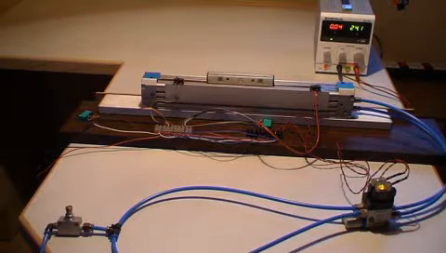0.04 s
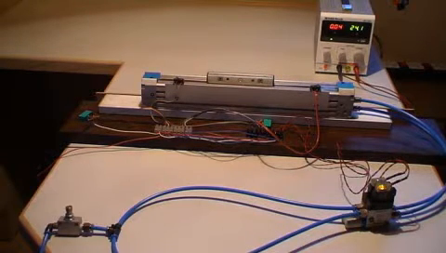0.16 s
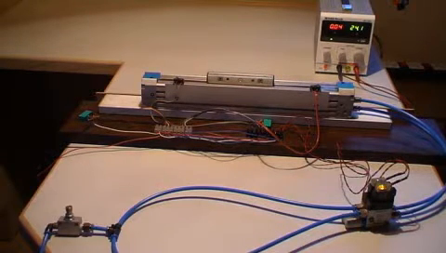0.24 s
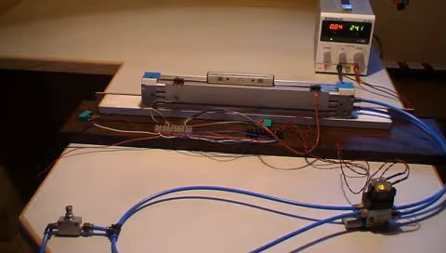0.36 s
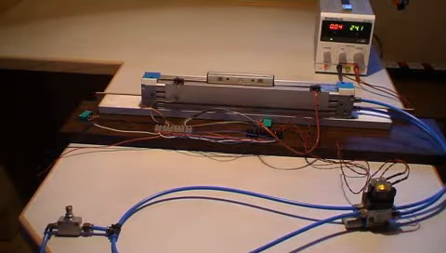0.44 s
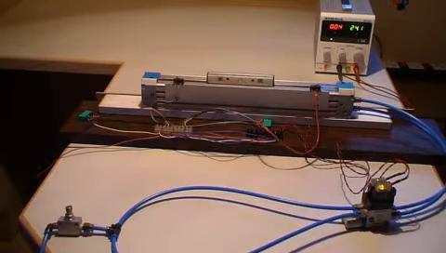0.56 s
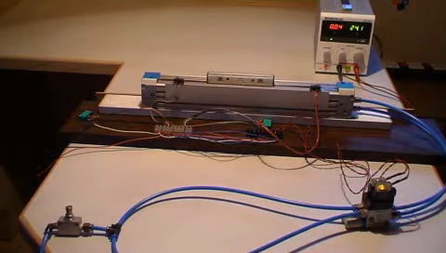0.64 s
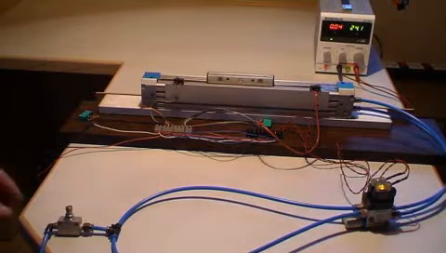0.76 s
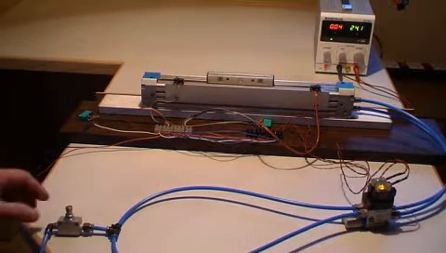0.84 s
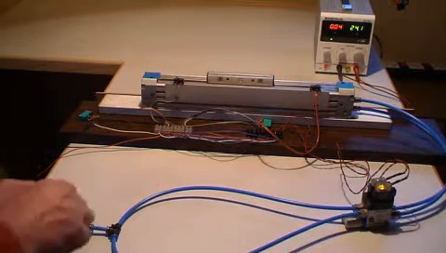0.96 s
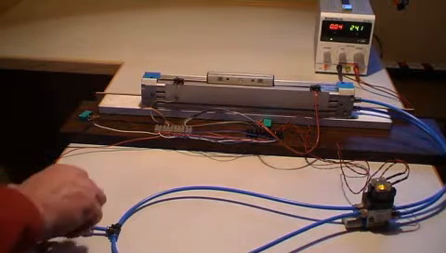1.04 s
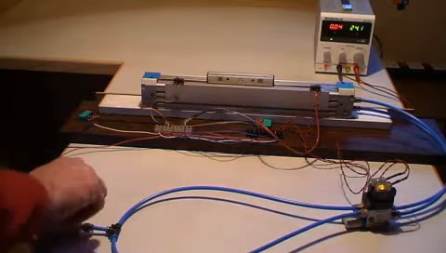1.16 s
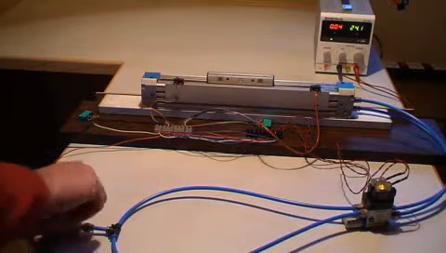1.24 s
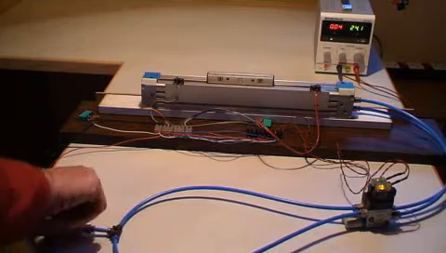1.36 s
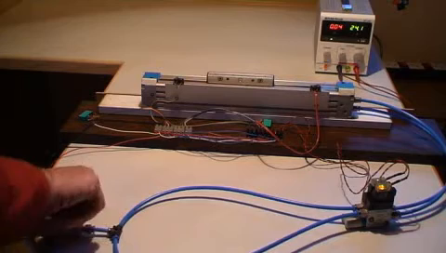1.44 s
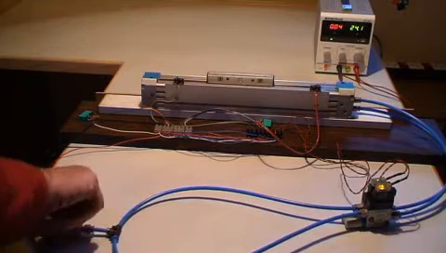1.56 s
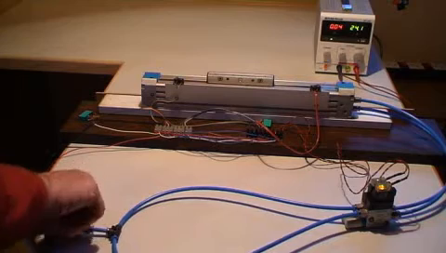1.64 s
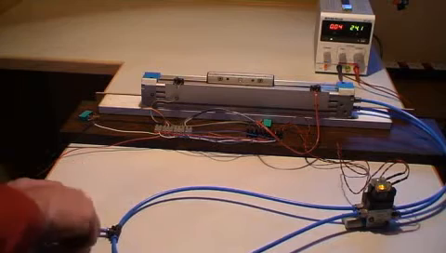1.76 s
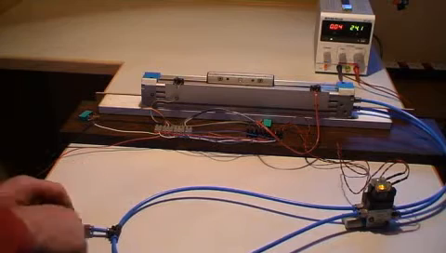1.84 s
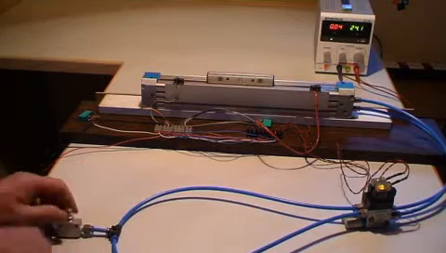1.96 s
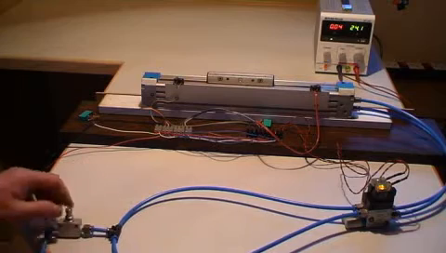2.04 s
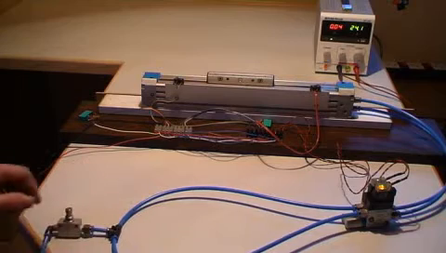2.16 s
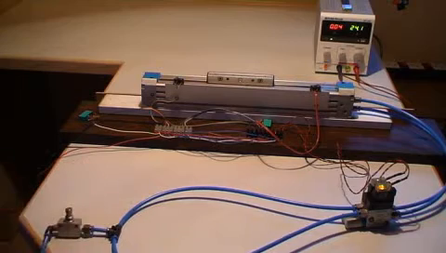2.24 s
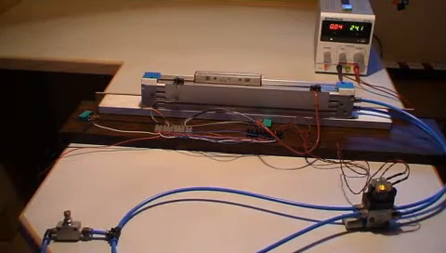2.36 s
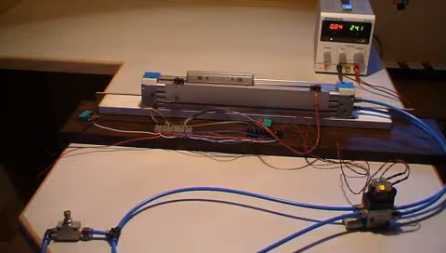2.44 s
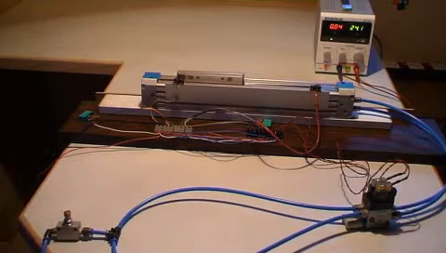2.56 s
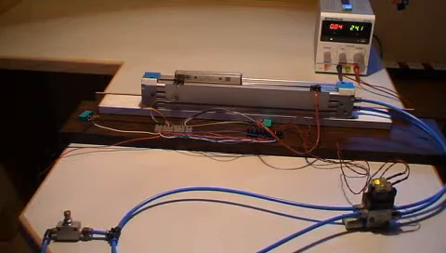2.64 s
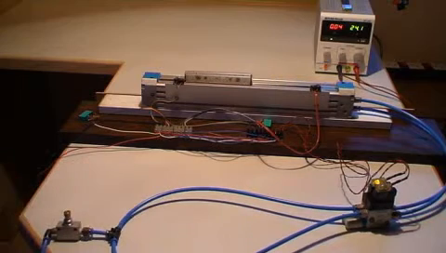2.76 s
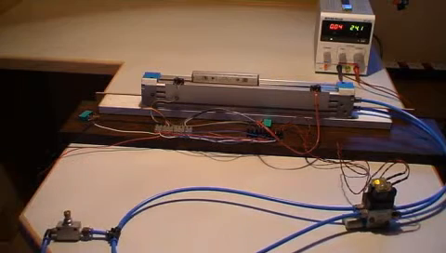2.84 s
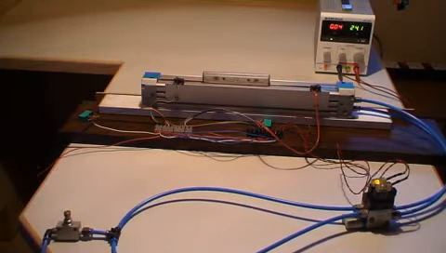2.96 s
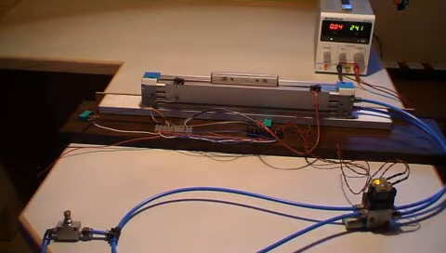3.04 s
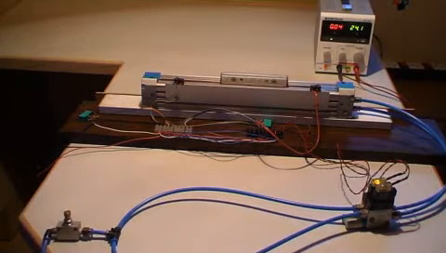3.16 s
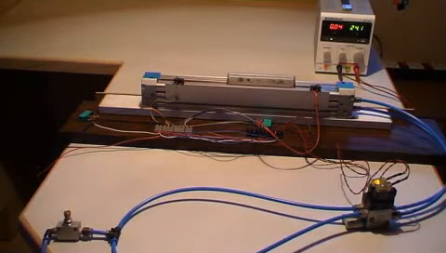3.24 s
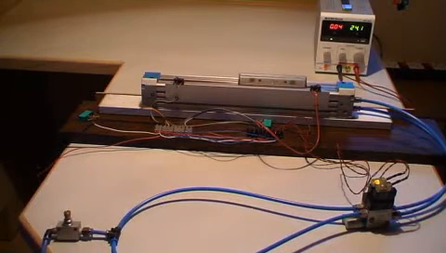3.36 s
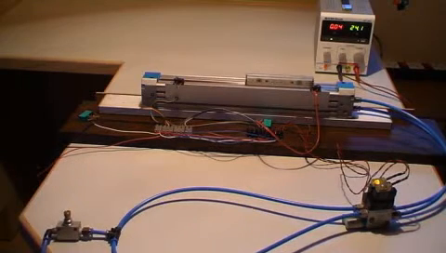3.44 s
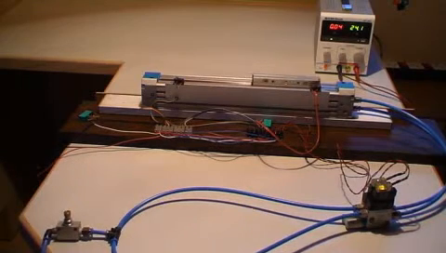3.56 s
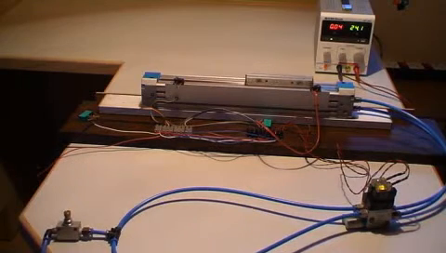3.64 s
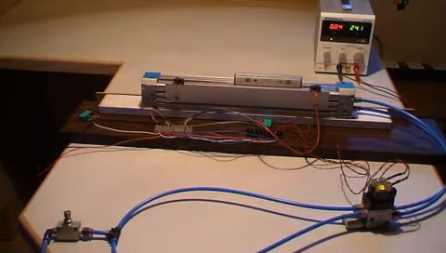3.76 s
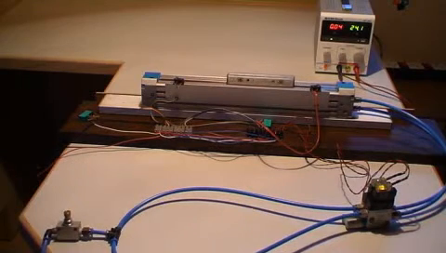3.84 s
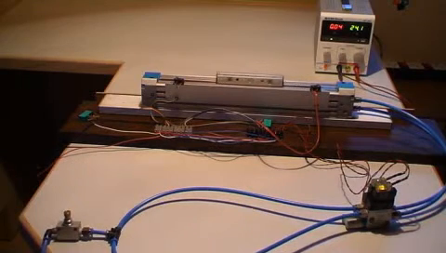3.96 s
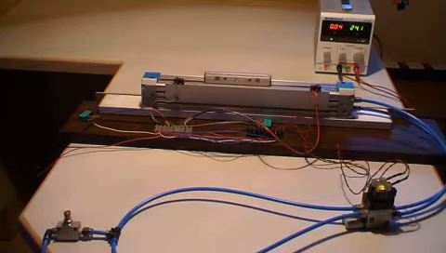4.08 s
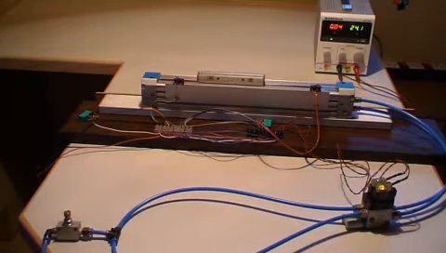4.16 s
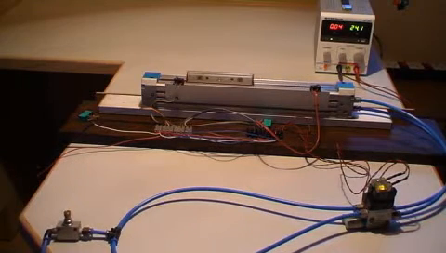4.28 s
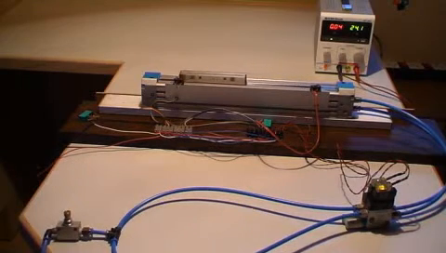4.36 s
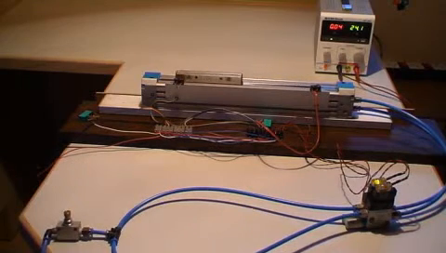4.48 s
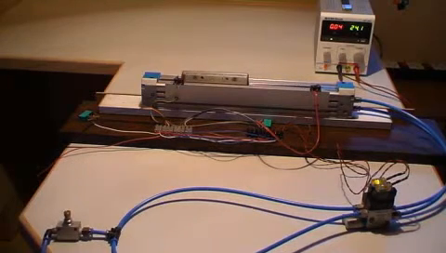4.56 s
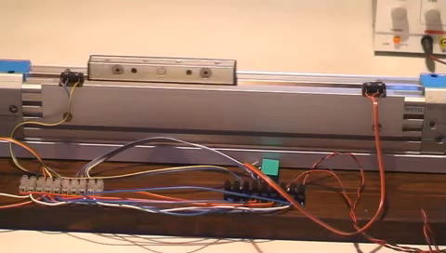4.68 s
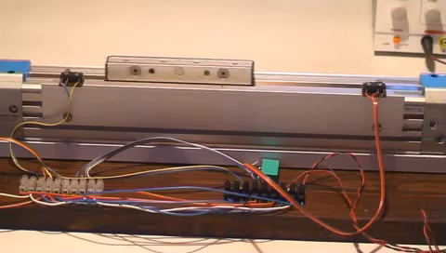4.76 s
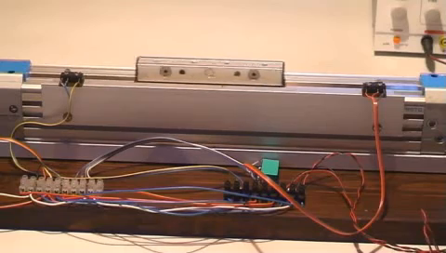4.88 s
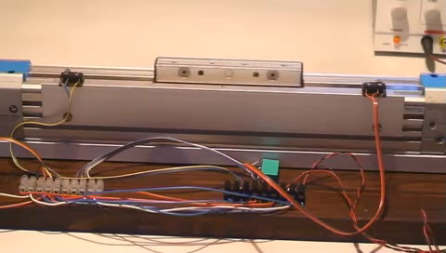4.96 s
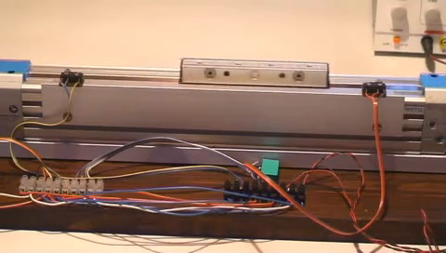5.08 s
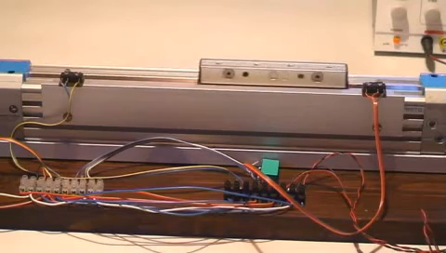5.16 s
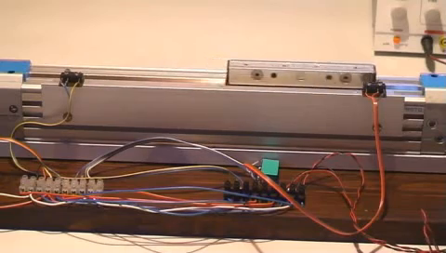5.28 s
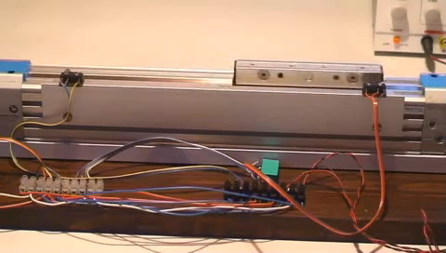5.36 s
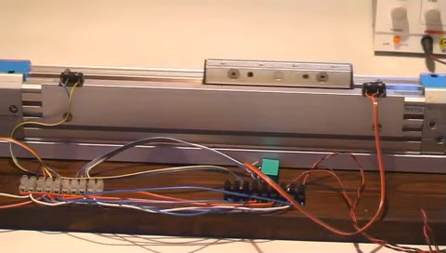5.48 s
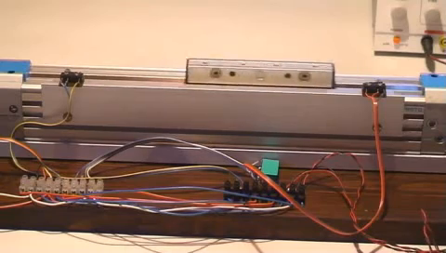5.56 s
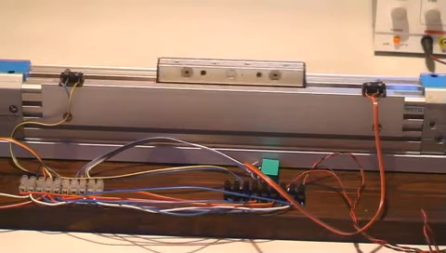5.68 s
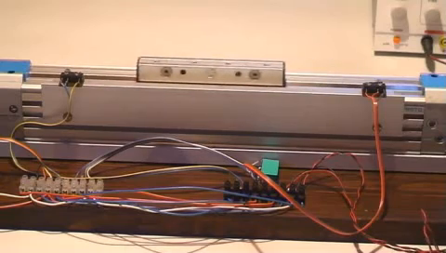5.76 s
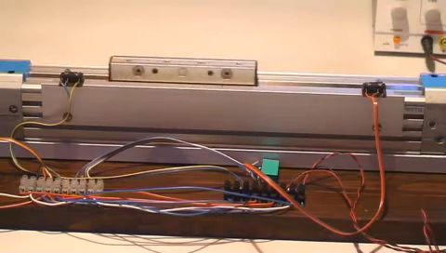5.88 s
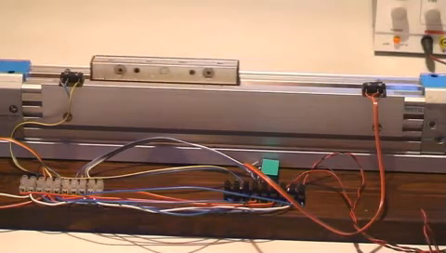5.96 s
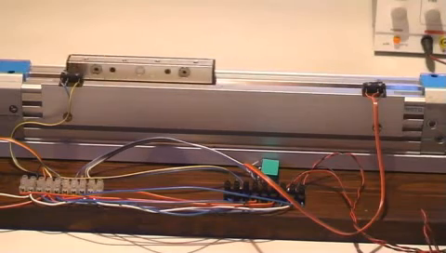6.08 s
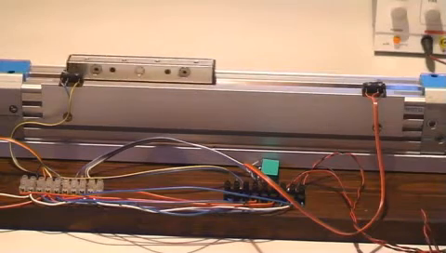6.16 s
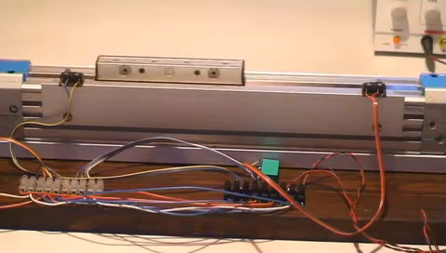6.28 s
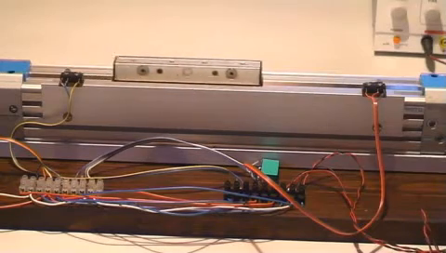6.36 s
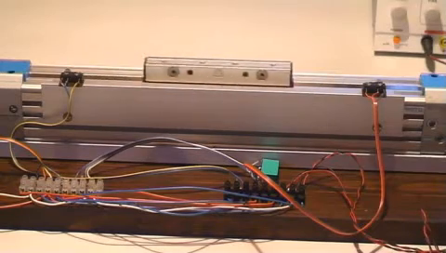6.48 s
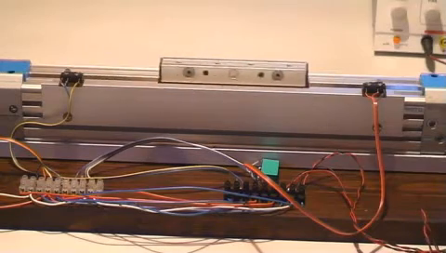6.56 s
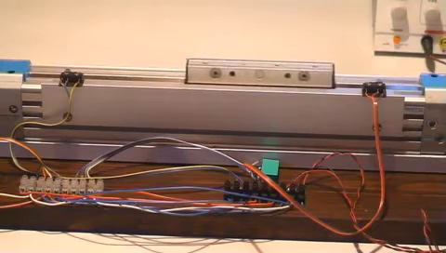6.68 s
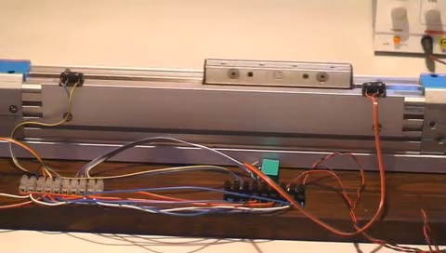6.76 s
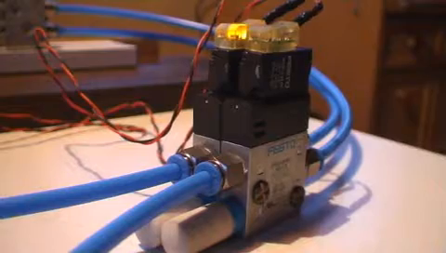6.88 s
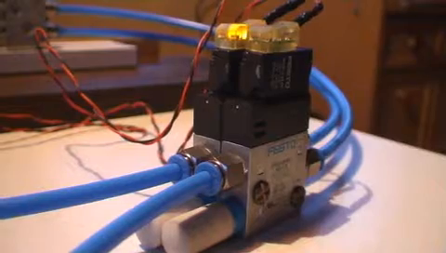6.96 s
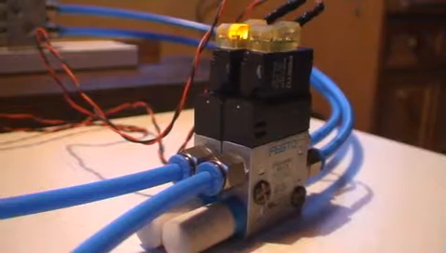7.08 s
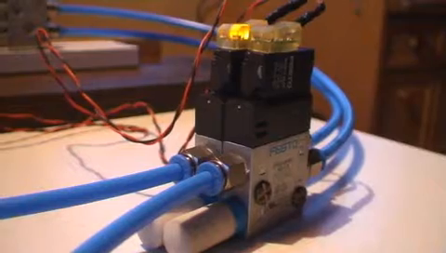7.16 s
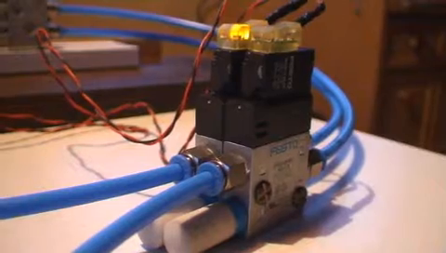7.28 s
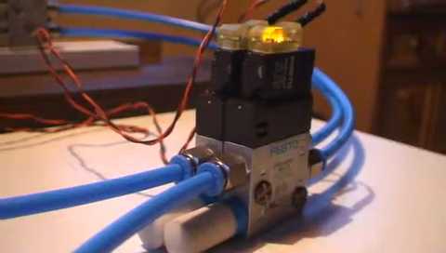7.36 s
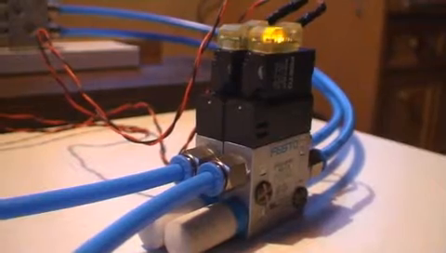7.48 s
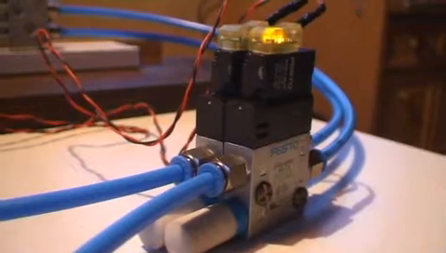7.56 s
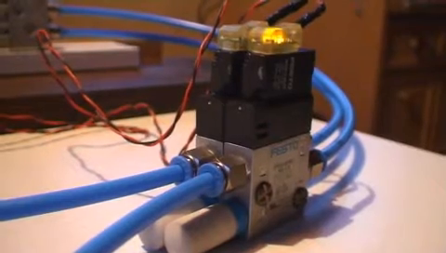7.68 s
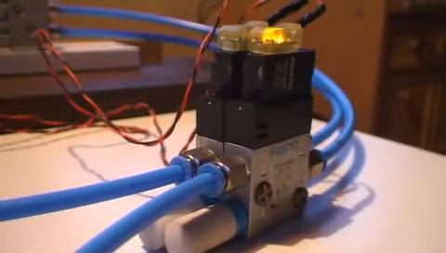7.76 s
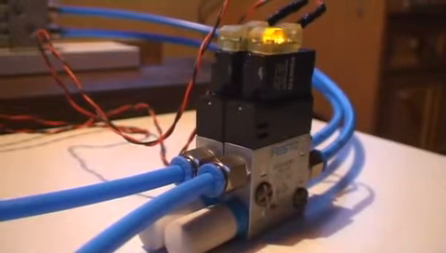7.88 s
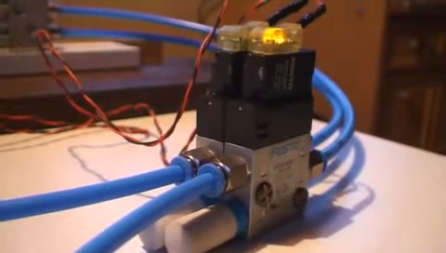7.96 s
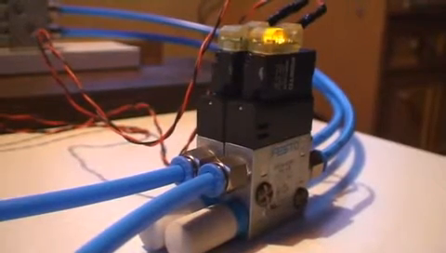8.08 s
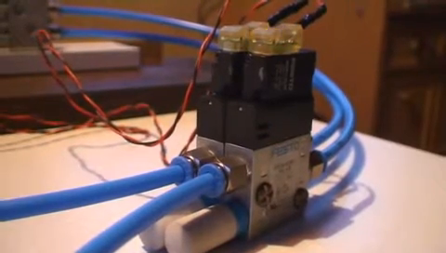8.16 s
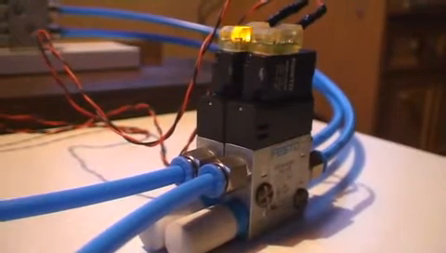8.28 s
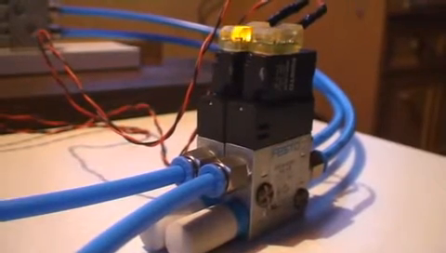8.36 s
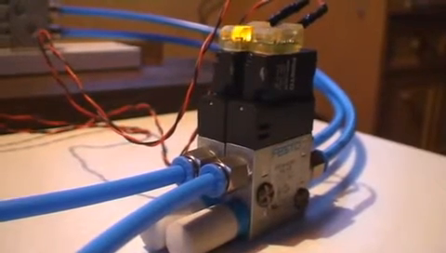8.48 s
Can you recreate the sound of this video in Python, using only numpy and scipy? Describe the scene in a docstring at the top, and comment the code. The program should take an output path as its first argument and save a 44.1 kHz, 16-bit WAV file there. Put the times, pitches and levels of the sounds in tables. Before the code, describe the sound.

Close, hissy stereo microphone on a workbench. First, quiet handling knocks, thin clicks and one rough scrape of a hand. Then the hiss rises and a sliding cylinder runs: seven evenly spaced reversals, each a tight burst of metallic clicks, a short sputtering air puff, a hollow woody-metal thump with knocks, and a brief room tail. Left and right ends differ slightly; two small clicks answer afterwards.

```python
"""In a small room a hand sets the throttle of a bench rig: dry ticks, swishes, a scuff, rustling cloth.
Wide microphone hiss then steps up, thin whistles join it, and a rodless pneumatic cylinder starts to shuttle.
At each end the carriage meets a lever, a limit switch clicks, the solenoid valve snaps over, the vented chamber
puffs through its silencer and the reversal thumps the bench; the carriage knocks in its guide and fittings rattle.
Switch and solenoid then drop back. Clicks and thumps are ringing modes; puff, scuff and hiss are shaped noise."""
import sys
import numpy as np
from scipy import signal
from scipy.fft import rfft, irfft, next_fast_len
from scipy.io import wavfile

SR = 44100
rng = np.random.default_rng(int(sys.argv[2]) if len(sys.argv) > 2 else 0)


def master(y):
    """Save y as 16-bit WAV."""
    cut = np.clip(np.atleast_2d(y).T, -1, 1)
    pcm = np.round(cut * 32767)  # scale
    wavfile.write(sys.argv[1], SR, pcm.astype(np.int16))


N = 376173   # length in samples
AGE = np.arange(32768) / SR   # time since the start of a short sound, in seconds
HISS_STEP_S, HISS_BEFORE_DB = 2.358, -9   # when the hiss steps up; its mean level until then, against after
LOW_CUT_HZ, CUTOFF_HZ = 40, 15400   # corners of the microphone and of the steep top cut

# Colours are curves over frequency: only their shape counts, each sound sets its own loudness.
# Levels inside an event are relative to that event.

# Carriage trips a limit switch: trip_s, end, spool_delay_s, thump_db, exhaust_db
REVERSALS = [(2.5895, "left", 0.051, -37, -31.5), (3.531, "right", 0.044, -35, -34),
             (4.4324, "left", 0.0405, -33.5, -32.5), (5.3839, "right", 0.0438, -33.5, -34.5),
             (6.3093, "left", .0412, -33, -32.5), (7.2851, "right", 0.045, -33.5, -34),
             (8.234, "left", 0.041, -33.5, -32)]
# Modes of rail, board and bench: mode_hz, t60_s, left_end_db, right_end_db
BENCH_MODES = [(161.8, 0.57, -11.5, -9.5), (181, 0.16, -5.5, -3), (236.5, 0.13, -2.5, -14),
               (281, 0.2, -4, -6), (316.8, 0.41, -3, -2.5), (373, 0.46, -7, -3.5), (437, 0.55, -11.5, -11),
               (475, 0.36, -10.5, -7), (491, 0.51, -6.5, -3.5), (539, 0.53, -10.5, -21), (627, 0.21, 0, -7),
               (680, 0.22, 1.5, -15), (698, 0.23, 2.5, -19), (715, 0.34, -7.5, -30), (723, 0.34, -4, -9),
               (788, 0.43, -7.5, -8), (832, 0.42, -3, -2), (878, 0.17, -5.5, 0), (899, 0.66, -10, -13.5),
               (982, 0.92, -17, -15), (1059, 0.87, -20, -23), (1204, 0.32, -24, -3.5), (1220, 0.11, 5, 9.5),
               (1245, 0.12, 9, -1), (1350, 0.15, -1, -9), (1967, 0.08, 9.5, 7), (2055, 0.093, 10, 6),
               (2360, 0.11, -3, 0), (2770, 0.08, 5, -16), (3870, 0.22, -4.5, -25), (4130, 0.5, -19, -26)]
# Carriage jolts the bench and rocks back, by end: delay_s, level_db
JOLTS = {"left": [(-.001, -4), (.023, 0.5), (.038, -1.5), (.07, 0), (.105, -6.5)], "right": [(-.001, 0.5),
         (.019, -2.5), (.04, 0), (.057, -2.5), (.09, -7), (.122, -6)]}
# Colour of dense small bench resonances: freq_hz, density_db
THUD = [(15, -50), (35, -31), (70, -21), (125, -18), (170, -2), (235, -10), (320, 4), (500, 2.5), (800, -2),
        (1000, -3), (1300, -0.5), (1800, -21), (4000, -13.5), (12000, -62)]
# Play in the guide lets the carriage knock on the rail, by end: delay_s, level_db
RAIL_KNOCKS = {"left": [(.02, 2.5), (.065, 5), (.093, -3)], "right": [(.016, 3), (.048, 4.5), (.082, 1.5),
               (.108, -12)]}
# What that knock rings with, by end: mode_hz, level_db, t60_s
RAIL_RING = {"left": [(494, -1, 0.043), (627, -5, .03), (720, 0.5, 0.042), (823, -4, 0.038),
             (1000, -6, 0.033)], "right": [(620, -9, .03), (784, -4.5, .03), (903, 1, .035),
             (1218, 0.5, .03)]}

# Colour of air through each silencer, by end: freq_hz, density_db
EXHAUST_COLOUR = {"left": [(500, -20), (1100, -24), (1500, -6), (2000, -4.5), (2700, -3.5), (3450, -1.5),
                  (4500, -1.5), (6200, -14), (7200, -4), (10500, -12.5), (15500, -44)],
                  "right": [(500, -27), (1100, 8), (1500, 0), (2000, 2), (2800, -2), (3700, -0.5),
                  (5200, 1), (6200, -13), (8000, 0), (10500, -17), (15500, -36)]}
# How long each band of the puff lasts: freq_hz, t60_s
EXHAUST_T60 = [(1200, 0.084), (2500, 0.12), (5000, 0.073), (10000, 0.058)]
# Speed of the puff's sputter: rate_hz, density_db
SPUTTER = [(100, -6.0), (700, 26), (2500, -39)]
# Spool hits its stop and rebounds, by end: delay_after_opening_s, peak_db (against the exhaust level)
SPOOL_KNOCKS = {"left": [(.0052, -4), (.0083, 13.5), (.0115, 5), (.021, 8)], "right": [(.0076, 14.5),
                (.0088, 8), (.015, -6)]}
# Colour of the spool's dull kick through the valve body: freq_hz, density_db
KICK = [(15, -47), (45, -19), (100, -5.5), (300, 3.5), (900, -9), (1600, -8.5), (3000, -15.5), (9000, -54)]
# Colour of the spool meeting its stop: freq_hz, density_db
CLACK = [(400, -16), (1200, 4), (2300, 8), (4000, -1.5), (5600, 5.5), (8500, -7), (11000, -16),
         (15500, -29)]

# Chain of contacts started by each trip, by end: delay_s, level_db, part
PULL_IN = {"left": [(0, -33, "left switch"), (.003, -41, "left switch"), (.0133, -37.5, "coil"),
           (.015, -23.5, "left armature"), (.0232, -27, "left armature"), (.027, -23, "seat")],
           "right": [(.001, -43, "right switch"), (.0055, -42, "right switch"), (.0134, -36, "coil"),
           (.0158, -29.5, "seat"), (.0233, -22, "right armature"), (.027, -25, "seat")]}
# Carriage leaves and the switch springs back: start_s, end, level_db
RELEASES = [(2.7024, "left", -24), (3.6162, "right", -26.5), (4.531, "left", -28.5),
            (5.4732, "right", -25.5), (6.4095, "left", -30), (7.3777, "right", -26.5),
            (8.3361, "left", -29.5)]
# Solenoid drops back: start_s, end, level_db
RETURNS = [(2.741, "left", -26), (3.6525, "right", -31), (4.5696, "left", -27), (5.5068, "right", -31.5),
           (6.4494, "left", -26.5), (7.4094, "right", -31), (8.3768, "left", -25)]
# Solenoid bounces on its stop, by end: delay_s, level_db
RETURN_BOUNCES = {"left": [(0, 1), (.008, -19)], "right": [(-.0009, -2.5), (.0005, -0.5)]}
# What each part rings with, by part: mode_hz, level_db, t60_s
PART_RING = {"left switch": [(1470, -16, 0.045), (1770, -7.5, 0.016), (2320, -12, .025), (3650, -16, 0.014),
             (10760, -18, .025)], "right switch": [(3420, -7, 0.035), (3800, -9, .03), (9950, -15, .03)],
             "coil": [(703, -6, 0.21), (878, -7, 0.052), (1250, -4.5, 0.031), (5340, -6, 0.027),
             (6170, -6, 0.03), (10570, -8, 0.033)], "left armature": [(5930, -16, 0.025),
             (9700, -13, 0.014), (10400, -7.5, 0.0097), (12300, -10.5, .012)],
             "right armature": [(7870, -14.5, 0.018), (10400, -8, 0.011), (10950, -13, 0.0071),
             (11500, -4, 0.011), (12600, -10, 0.0098)], "seat": [(5360, -2, 0.0072), (6400, -9, 0.01),
             (7400, -5, 0.0071)], "left release": [(3570, -5, 0.0058), (5200, -7, 0.0092),
             (7200, -6, 0.0051), (9300, -5, 0.0055)], "right release": [(2190, -15, .008),
             (5600, -3, 0.0046), (7640, 2.5, 0.0045), (13800, 6, 0.0023)],
             "left return": [(6680, -4, 0.0073), (7100, -3.5, 0.0083), (10930, -7.5, 0.01)],
             "right return": [(3510, 0.5, 0.012), (4180, -20.5, 0.34), (5550, -6, 0.0088),
             (7700, -4, 0.0062), (10550, -2, 0.0083)]}
# First touch of a contact, by part: peak_db (against the contact level)
SNAP_DB = {"left switch": -14, "right switch": -4, "coil": -1, "left armature": -7, "right armature": -3,
           "seat": -4, "left release": -7, "right release": -3, "left return": -10, "right return": -8}
# Colour of metal on metal: freq_hz, density_db
CRACK = [(200, 3), (900, 4), (3000, -8.5), (5500, -0.5), (9000, 2), (12500, -0.5), (15500, -13.5)]
# Colour of the housing's faint buzz: freq_hz, density_db
HOUSING_BUZZ = [(300, 2.0), (900, 1.5), (2500, 3.5), (4000, 2.0), (6000, 2.5), (10000, -3.0), (15000, -26)]
# Speed of the housing's rattle: rate_hz, density_db
HOUSING_RATTLE = [(40, 22.0), (300, -12), (1000, -39)]

# Carriage meets the switch lever before the trip, by end: lead_s
LEVER_LEAD_S = {"left": .045, "right": .026}
# How it touches the lever, by end: tap_db, bump_db, slide_db
LEVER_TOUCH = {"left": (-57, -50, -80), "right": (-43, -52, -55)}
# Colour of the tap on the lever: freq_hz, density_db
LEVER_TAP = [(300, -15), (900, 0), (1250, 8), (1700, -18), (6000, -23), (7200, -12), (8500, -38)]
# Colour of the scrape along the lever: freq_hz, density_db
LEVER_SLIDE = [(400, -20), (1200, 5), (2500, -7), (5500, 1), (6300, 6), (7200, -10), (13000, -18)]
# Colour of loose fittings and wires: freq_hz, density_db
LOOSE_FITTINGS = [(150, -32), (400, -0.5), (900, -1), (1400, -5.0), (3000, -11.5), (7000, -19), (14000, -37)]

# Dull handling knocks before the run: start_s, level_db
TICKS = [(0.1432, -47.5), (.186, -51), (0.226, -58), (0.2259, -44.5), (0.2291, -50), (.704, -58),
         (0.737, -53)]
# Colour of a handling knock: freq_hz, density_db
TICK = [(15, -34), (60, -10), (200, 5), (650, 0), (1500, -11), (3000, -17), (7000, -37)]
# Thin, dry clicks among them: start_s, peak_db
THIN_CLICKS = [(.2225, -53), (.2558, -43), (.3205, -51), (.509, -50), (.704, -51), (1.348, -51),
               (1.882, -51)]
# Colour of a thin click, also of the grain in the cloth: freq_hz, density_db
THIN_CLICK = [(200, -15), (800, 4.5), (3000, -4), (5800, -9.5), (7000, -11), (14000, -30)]
# Fingers and sleeve brush past: start_s, level_db, t60_s
SWISHES = [(.317, -59, 0.081), (.354, -56.5, 0.39), (.385, -65, .5), (1.72, -69, 0.3), (1.878, -63, 0.11)]
# Colour of a swish: freq_hz, density_db
SWISH = [(300, -6), (1000, 9.5), (2500, -8), (6000, -9), (7600, -2), (8600, -14), (9100, -8), (9600, -13),
         (12000, -25)]
# Colour of a hand on the bench: freq_hz, density_db
SCUFF = [(150, -34), (400, -2), (800, 3), (1300, 2), (1800, -6), (2300, -14), (4000, -23), (9000, -45)]
# Colour of the scuff's duller tail: freq_hz, density_db
DULL_SCUFF = [(150, -36), (380, 11), (850, 6), (1300, -5), (2500, -41)]
# Speed of the scuff's roughness: rate_hz, density_db
SCUFF_ROUGHNESS = [(30, -8), (150, 3), (600, -30)]
# Soft rustles of sleeve and hand: middle_s, length_s, level_db
SLEEVE_MOVES = [(0.108, 0.24, -68), (0.426, 0.33, -70.5), (.7, 0.13, -70), (.96, .12, -71.5),
                (1.12, 0.4, -72.5), (1.79, 0.63, -71.5), (2.194, 0.12, -69), (5.948, 0.27, -63)]
# Colour of the cloth common to both sides: freq_hz, density_db
SLEEVE_MID = [(100, 1), (500, 6.5), (1200, 2), (2500, -3.5), (5000, -18), (12000, -29)]
# Colour of the cloth opposed between the sides: freq_hz, density_db
SLEEVE_SIDE = [(40, -27), (130, -2), (400, 3), (1200, 3), (3000, -8), (10000, -30), (14000, -55)]
# Speed of the cloth's unevenness: rate_hz, density_db
CLOTH_CATCHING = [(3, -8), (14, 0), (40, -7), (200, -70)]

# Air singing in the tubes: centre_hz, width_hz, level_db
WHISTLES = [(814, 12, -70.5), (1487, 36, -74.5), (4120, 160, -74.5), (9170, 350, -82)]
# Colour of the hiss common to both sides: freq_hz, density_db
HISS_MID = [(15, -46), (25, -14), (236, -0.5), (560, -1.5), (754, -3.5), (818, -4), (936, -5), (1440, -6),
            (2990, -11), (4140, -14), (4740, -14), (9320, -20), (12900, -24), (14400, -17), (16000, -56)]
# Colour of the hiss opposed between the sides: freq_hz, density_db
HISS_SIDE = [(15, -57), (25, -23), (102, -12), (206, -4), (335, -2.5), (405, -2), (503, -2.5), (818, -4),
             (1560, -9.5), (4140, -22), (9840, -36.5), (11000, -39), (12500, -41), (14400, -69),
             (16000, -72)]
# Slow and fast wavering of the opposed hiss: rate_hz, density_db
HISS_SWAY = [(1, -7), (4, -4), (12, -28), (100, -90)]
HISS_FLUTTER = [(2, -22), (30, 3), (200, -34), (1000, -80)]
# Colour of the room's reflections: freq_hz, density_db
ROOM_COLOUR = [(60, -5), (250, 3.5), (1000, 3.5), (4000, -1.5), (8000, -1.5), (15000, 2)]
# How long each band of the room's tail lasts: freq_hz, t60_s
ROOM_T60 = [(100, 0.66), (1000, 0.65), (4000, 0.46), (12000, 0.29)]
# The capsules differ in balance over frequency: freq_hz, left_minus_right_db
CAPSULE_BALANCE = [(150, 0.8), (1500, 0.3), (4000, 0), (7000, -0.5), (11500, 1)]


def from_db(db):
    """Decibels to gain."""
    return 10 ** (np.asarray(db) / 20)


def rms_one(x):
    """Scale to an rms of one."""
    return x / np.sqrt(np.mean(x ** 2) + 1e-20)


def at_hz(points, hz):
    """Read a table on a log-frequency axis."""
    known_hz, values = np.transpose(points)
    return np.interp(np.log(np.maximum(hz, 1)), np.log(known_hz), values)


def add(track, s, sound):
    """Mix a sound into a stereo track from time s."""
    start = max(round(s * SR), 0)
    part = sound[..., :track.shape[1] - start]
    track[:, start:start + part.shape[-1]] += part


def noise(spectrum, size):
    """Steady coloured noise of rms one."""
    padded = next_fast_len(size, True)
    gain = from_db(at_hz(spectrum, np.fft.rfftfreq(padded, 1 / SR)))
    coloured = irfft(rfft(rng.standard_normal(padded)) * gain, padded)
    return rms_one(coloured[:size])


def stereo(mid, side):
    """Left and right from their common and opposed parts."""
    return np.array([mid + side, mid - side])


def wide_noise(spectrum, side_db):
    """A short stretch of stereo noise; side_db sets the opposed part against the common one."""
    return stereo(noise(spectrum, len(AGE)), from_db(side_db) * noise(spectrum, len(AGE)))


def fade(t60):
    """Exponential decay, down 60 dB after t60 seconds."""
    return from_db(-60 * AGE / t60)


def swell(rise_s):
    """Smooth onset."""
    return 1 - np.exp(-(AGE / rise_s) ** 2)


def arch(middle_s, length_s):
    """A smooth rise and fall around a moment."""
    position = (np.arange(N) / SR - middle_s) / length_s
    return np.cos(np.pi * np.clip(position, -.5, .5))


def die_by_band(x, t60s):
    """Let each band of a sound die at its own rate."""
    hz, bins = np.fft.rfftfreq(len(AGE), 1 / SR), rfft(x)
    centres = [centre for centre, t60 in t60s]
    # overlapping bands that add up to one at every frequency
    shares = [at_hz(list(zip(centres, row)), hz) for row in np.eye(len(t60s))]
    return sum(irfft(bins * share) * fade(t60) for share, (centre, t60) in zip(shares, t60s))


def ring(hz, t60, spread):
    """One decaying mode; it reaches the two sides with slightly different phases."""
    phase = rng.uniform(0, 2 * np.pi) + spread * rng.standard_normal() * np.array([[1], [-1]])
    out, age = np.zeros((2, len(AGE))), AGE[AGE < 2 * t60]
    out[:, :len(age)] = np.sin(2 * np.pi * hz * age + phase) * from_db(-60 * age / t60)
    return out


def cluster(hz, t60, width, spread_per_khz=0.045):
    """Close modes that beat and blur the pitch of a small metal part; the higher, the less alike on the sides."""
    offsets = np.linspace(-1, 1, num=3) + rng.uniform(-.45, 0.44, size=3)
    spread = spread_per_khz * hz / 1000
    modes = sum(ring(hz * (1 + width * offset), t60, spread) for offset in offsets)
    return modes / np.sqrt(len(offsets))


def snap(spectrum):
    """One sharp, causal pulse of a given colour; height one."""
    size = len(AGE)
    # folding the cepstrum gives minimum phase: all energy as early as the colour allows
    cepstrum = irfft(np.log(from_db(at_hz(spectrum, np.fft.rfftfreq(size, 1 / SR)))))
    causal = np.r_[1, np.full(size // 2 - 1, 2), 1, np.zeros(size // 2 - 1)]
    pulse = irfft(np.exp(rfft(cepstrum * causal)))
    return pulse / np.abs(pulse).max()


def crackle(spectrum, per_s, spread_db, size):
    """Random snaps of uneven strength; rms one."""
    chance, strength, sign = rng.random(size), rng.exponential(1, size), rng.choice([-1, 1], size)
    grains = (chance < per_s / SR) * sign * from_db(spread_db * np.minimum(strength, 2))
    return rms_one(signal.fftconvolve(grains, snap(spectrum))[:size])


def thumps(thud_db=-2.5, thud_t60=0.11, modes_db=-1.5, uneven_db=0.5, detune_per_khz=0.00592):
    """The reversal rings bench modes, mixed by end, the high ones shifting per stroke; each jolt adds a thud."""
    out = np.zeros((2, N))
    for trip_s, end, spool_s, thump_db, _ in REVERSALS:
        s, column, modes = trip_s + spool_s, list(JOLTS).index(end), 0
        for hz, t60, *levels_db in BENCH_MODES:
            strength, shift = rng.standard_normal(2)
            mode_gain = from_db(levels_db[column] + uneven_db * strength)
            mode_hz = hz * (1 + detune_per_khz * hz / 1000 * shift)
            modes = modes + mode_gain * ring(mode_hz, t60, spread=0.067)
        # the vibration takes time to spread
        add(out, s, from_db(thump_db + modes_db) * modes * swell(rise_s=0.013))
        for delay, db in JOLTS[end]:
            thud = noise(THUD, len(AGE)) * fade(thud_t60) * swell(rise_s=0.00036)
            add(out, s + delay, from_db(thump_db + thud_db + db) * thud)
    return out


def rail_knocks(level_db=-2):
    """The carriage knocks in its guide a few times as it turns round, ringing the rail's modes."""
    out = np.zeros((2, N))
    for trip_s, end, spool_s, thump_db, _ in REVERSALS:
        for delay, db in RAIL_KNOCKS[end]:
            knock = sum(from_db(mode_db) * ring(hz, t60, spread=0.28) for hz, mode_db, t60 in RAIL_RING[end])
            knock_gain = from_db(thump_db + level_db + db)
            add(out, trip_s + spool_s + delay, knock_gain * knock * swell(rise_s=0.0015))
    return out


def exhaust(lag_s=.0008, jet_db=2.0, sputter_db=3.5, kick_db=6, stop_s=.0075, chatter_db=-1, chatter_t60=0.076):
    """The spool kicks open, knocks and chatters on its stop; the chamber empties in a rough, dulling puff."""
    out = np.zeros((2, N))
    kick, knock = snap(KICK), snap(CLACK)
    for trip_s, end, spool_s, _, exhaust_db in REVERSALS:
        s = trip_s + spool_s
        jet = die_by_band(wide_noise(EXHAUST_COLOUR[end], side_db=-7.0), EXHAUST_T60)
        sputter = from_db(sputter_db * noise(SPUTTER, len(AGE)))
        chatter = crackle(CLACK, per_s=420, spread_db=0, size=len(AGE))
        add(out, s, from_db(exhaust_db + kick_db) * kick)
        add(out, s + lag_s, from_db(exhaust_db + jet_db) * jet * sputter * swell(rise_s=0.0032))
        add(out, s + stop_s, from_db(exhaust_db + chatter_db) * chatter * fade(chatter_t60))
        for delay, db in SPOOL_KNOCKS[end]:
            add(out, s + delay, from_db(exhaust_db + db) * knock)
    return out


def switching():
    """Every contact as start_s, level_db, part: pull-in at the trip, then switch release and solenoid return."""
    clicks = [(s + delay, db, part) for s, end, *_ in REVERSALS for delay, db, part in PULL_IN[end]]
    clicks += [(s, db, end + " release") for s, end, db in RELEASES]
    for s, end, db in RETURNS:
        clicks += [(s + delay, db + bounce_db, end + " return") for delay, bounce_db in RETURN_BOUNCES[end]]
    return clicks


def contacts(crack_db=-9, bounce_s=0.00095, buzz_db=-24, buzz_t60=0.33, rattle_db=3, width=0.0243):
    """A click is a snap, a burst of contact bounce, the ring of its part and a faint rattle of the housing."""
    out = np.zeros((2, N))
    bouncing = np.exp(-(AGE / bounce_s) ** 4)
    rattle = from_db(rattle_db * noise(HOUSING_RATTLE, len(AGE)))
    touch = snap(CRACK)
    for s, db, part in switching():
        tone = sum(from_db(mode_db) * cluster(hz, t60, width) for hz, mode_db, t60 in PART_RING[part])
        crack = from_db(crack_db) * wide_noise(CRACK, side_db=-6.0) * bouncing
        housing = from_db(buzz_db) * noise(HOUSING_BUZZ, len(AGE)) * rattle * fade(buzz_t60)
        click = from_db(SNAP_DB[part]) * touch + (tone + crack) * swell(rise_s=0.00023) + housing
        add(out, s, from_db(db) * click)
    return out


def levers(bump_t60=0.05, tap_s=0.0014, slide_s=0.044, let_go_s=0.0067):
    """A dull bump and a tap on the lever, with a scrape that grows and then lets go quickly."""
    out = np.zeros((2, N))
    for trip_s, end, *_ in REVERSALS:
        s = trip_s - LEVER_LEAD_S[end]
        tap_db, bump_db, slide_db = LEVER_TOUCH[end]
        bump = wide_noise(THUD, side_db=-14) * fade(bump_t60)
        pressing = np.interp(AGE, [0, slide_s, slide_s + let_go_s], [.5, 1, 0])
        slide = wide_noise(LEVER_SLIDE, side_db=-10) * pressing
        add(out, s, from_db(bump_db) * bump + from_db(slide_db) * slide)
        add(out, s + tap_s, from_db(tap_db) * snap(LEVER_TAP))
    return out


def rattles(level_db=-7, t60=0.47):
    """Loose fittings and wires rattle on the board after each reversal, as scattered snaps that die away."""
    out = np.zeros((2, N))
    for trip_s, _, spool_s, thump_db, _ in REVERSALS:
        grains = crackle(LOOSE_FITTINGS, per_s=170, spread_db=5.5, size=len(AGE))
        add(out, trip_s + spool_s, from_db(thump_db + level_db) * grains * fade(t60) * swell(rise_s=0.024))
    return out


def handling(tick_side_db=14, scuff_db=-52, rough_db=1.0, scuff_tail_db=-54):
    """Dry ticks, faint swishes, and the rough noise of a hand scuffing at the throttle, with a duller tail."""
    out = np.zeros((2, N))
    tick = snap(TICK)
    for s, db in TICKS:
        # mostly in opposite phase on the two sides
        add(out, s, from_db(db) * stereo(tick, from_db(tick_side_db) * tick))
    for s, db in THIN_CLICKS:
        add(out, s, from_db(db) * snap(THIN_CLICK))
    for s, db, t60 in SWISHES:
        add(out, s, from_db(db) * wide_noise(SWISH, side_db=-5) * swell(rise_s=0.01) * fade(t60))
    rough = from_db(rough_db * noise(SCUFF_ROUGHNESS, len(AGE)))
    scuff = rough * wide_noise(SCUFF, side_db=-10) * swell(rise_s=0.0083) * fade(t60=0.36)
    add(out, 1.32, from_db(scuff_db) * scuff)
    tail = wide_noise(DULL_SCUFF, side_db=-14) * swell(rise_s=0.0092) * fade(t60=0.43)
    add(out, 1.345, from_db(scuff_tail_db) * tail)
    return out


def rustles(side_db=13.0, grain_db=-5.5, uneven_db=2.5):
    """Grainy cloth noise, mostly in opposite phase on the two sides, swells and fades unevenly with each move."""
    grain = from_db(grain_db) * crackle(THIN_CLICK, per_s=140, spread_db=4, size=N)
    cloth = stereo(noise(SLEEVE_MID, N) + grain, from_db(side_db) * noise(SLEEVE_SIDE, N))
    catching = from_db(uneven_db * noise(CLOTH_CATCHING, N))
    moves = sum(from_db(db) * arch(s, length_s) for s, length_s, db in SLEEVE_MOVES)
    return cloth * catching * moves


def whistles():
    """Air streaming through the tubes sings as noise in narrow resonances, from the moment the hiss steps up."""
    out = np.zeros(N)
    for hz, width, db in WHISTLES:
        radius = np.exp(-np.pi * width / SR)   # pole radius sets the bandwidth
        poles = [1, -2 * radius * np.cos(2 * np.pi * hz / SR), radius * radius]
        out += from_db(db) * rms_one(signal.lfilter([1, 0, -1], poles, rng.standard_normal(N)))
    return out * (np.arange(N) / SR > HISS_STEP_S)


def hiss(mid_db=-58, side_db=-47.0, sway_db=0.03, flutter_db=1.4, top_hz=12700):
    """Microphone hiss, mostly in opposite phase on the two sides; it steps up just before the run."""
    t = np.arange(N) / SR
    waver_db = sway_db * noise(HISS_SWAY, N) + flutter_db * noise(HISS_FLUTTER, N)
    mid = from_db(mid_db) * noise(HISS_MID, N)
    side = from_db(side_db + waver_db) * noise(HISS_SIDE, N)
    both = signal.sosfilt(signal.butter(10, top_hz, fs=SR, output="sos"), stereo(mid, side))
    before = from_db(HISS_BEFORE_DB + np.array([[.9], [-.9]]))   # a little stronger on the left
    return both * np.where(t < HISS_STEP_S, before, 1)


def room(x, early_db=-6, tail_db=-4):
    """Quick reflections from bench top and wall, changing from stroke to stroke, then the diffuse tail."""
    source = x.mean(axis=0, keepdims=True) / np.sqrt(len(AGE))
    tail = die_by_band(wide_noise(ROOM_COLOUR, side_db=-3.0), ROOM_T60) * swell(rise_s=0.0056)
    out = signal.fftconvolve(source, from_db(tail_db) * rms_one(tail), axes=1)[:, :N]
    for trip_s, end, *_ in REVERSALS:
        s = trip_s - LEVER_LEAD_S[end]
        stroke = source[:, round(s * SR):][:, :len(AGE)]
        early = wide_noise(ROOM_COLOUR, side_db=-23.0) * swell(rise_s=0.0034) * fade(t60=0.052)
        add(out, s, signal.fftconvolve(stroke, from_db(early_db) * rms_one(early), axes=1))
    return out


def scene(bench_wet_db=-11, click_wet_db=-4):
    """The rig in its room, over the hiss; the small contacts face the microphone and stay drier than the air."""
    clicks, air, bench = contacts(), exhaust() + levers(), thumps() + rail_knocks()
    reflections = room(from_db(click_wet_db) * clicks + air + from_db(bench_wet_db) * bench)
    rig = clicks + air + bench + reflections + rattles()
    return rig + handling() + rustles() + whistles() + hiss()


def record(dry):
    """Each capsule has its own balance; the microphone loses the deep bass; the top is cut steeply."""
    size = next_fast_len(N, True)
    left_minus_right_db = at_hz(CAPSULE_BALANCE, np.fft.rfftfreq(size, 1 / SR))
    balance = from_db(np.array([[.5], [-.5]]) * left_minus_right_db)
    heard = irfft(rfft(dry, size) * balance, size)[:, :N]
    lean = signal.sosfilt(signal.butter(2, LOW_CUT_HZ, "high", fs=SR, output="sos"), heard)
    return signal.sosfilt(signal.ellip(10, .2, 80, CUTOFF_HZ, fs=SR, output="sos"), lean)


dry = scene()
out = record(dry)
master(out)
```